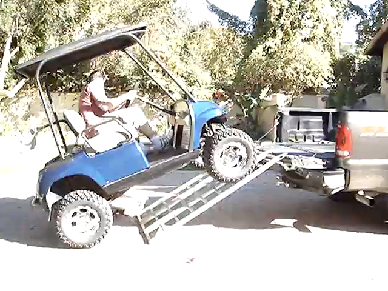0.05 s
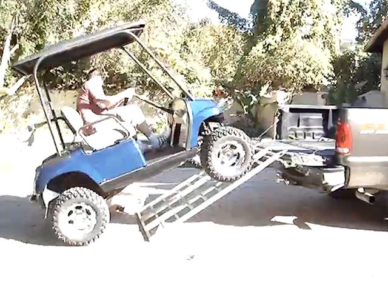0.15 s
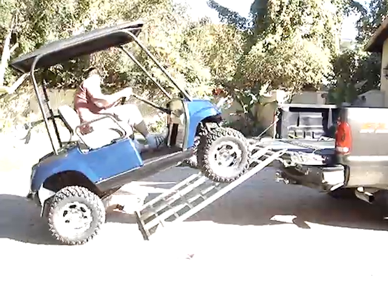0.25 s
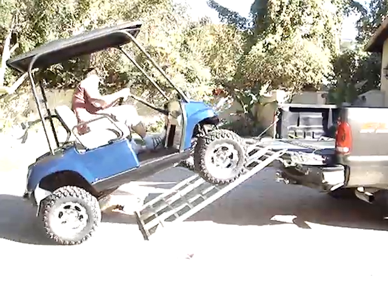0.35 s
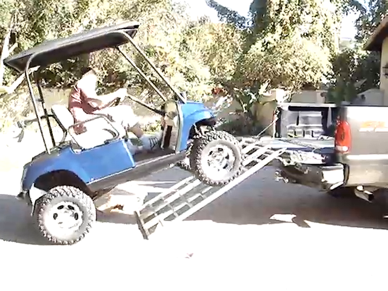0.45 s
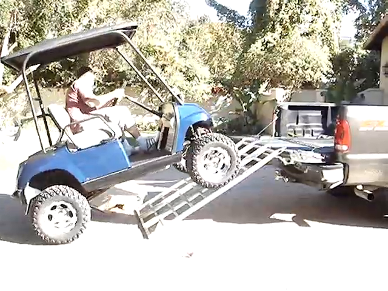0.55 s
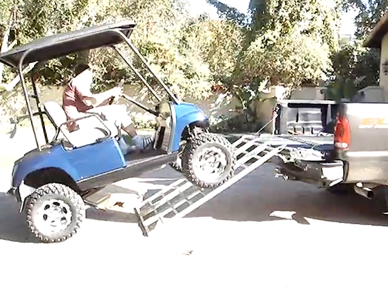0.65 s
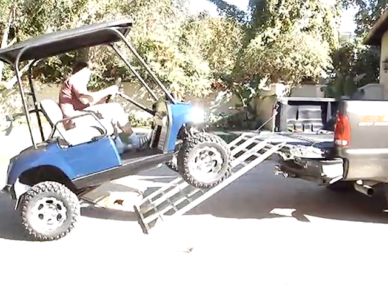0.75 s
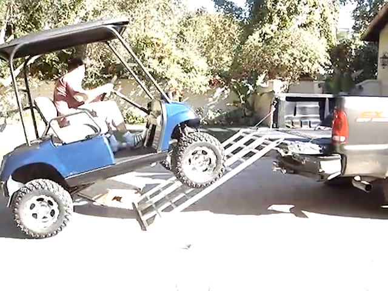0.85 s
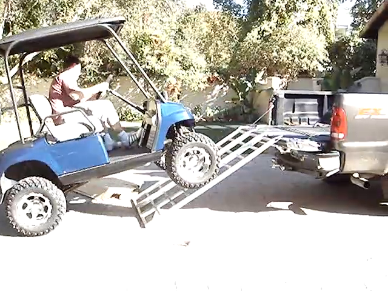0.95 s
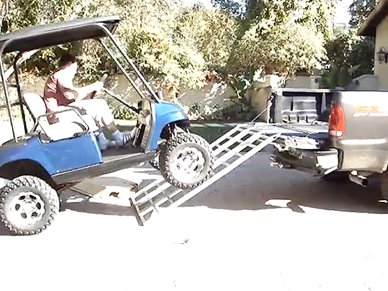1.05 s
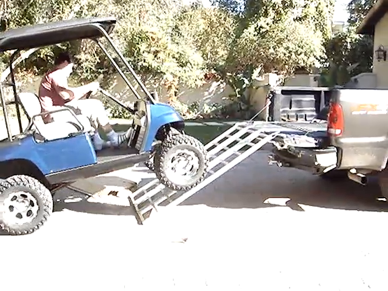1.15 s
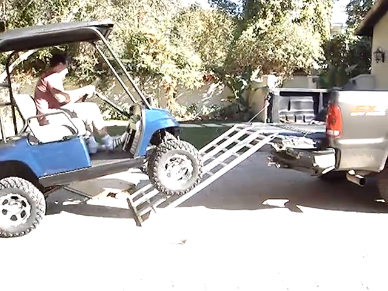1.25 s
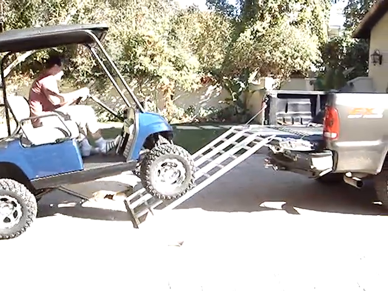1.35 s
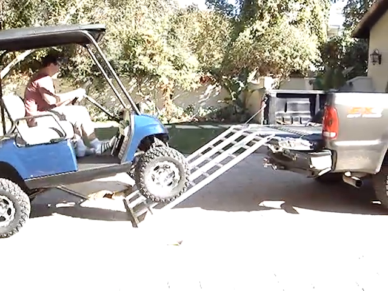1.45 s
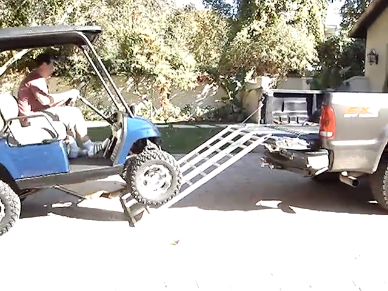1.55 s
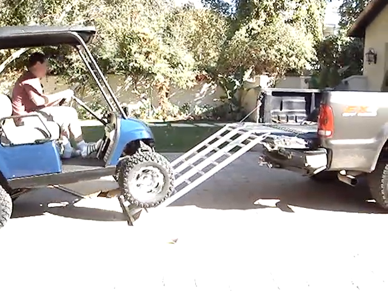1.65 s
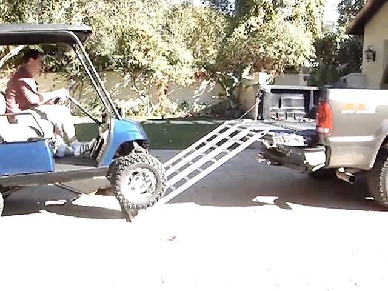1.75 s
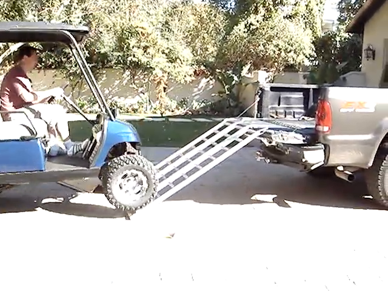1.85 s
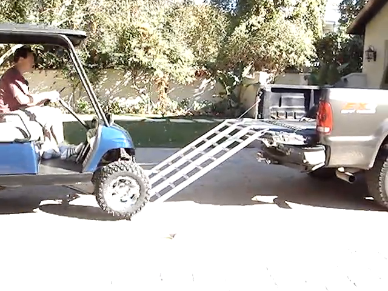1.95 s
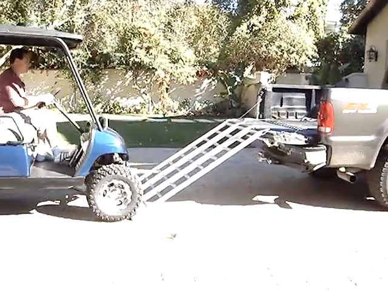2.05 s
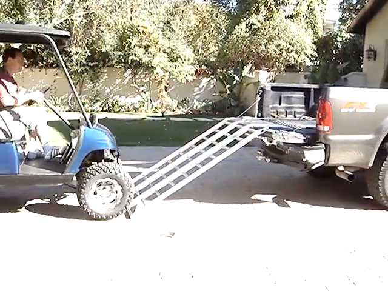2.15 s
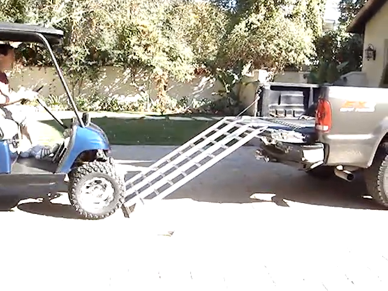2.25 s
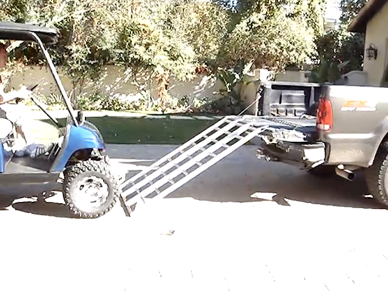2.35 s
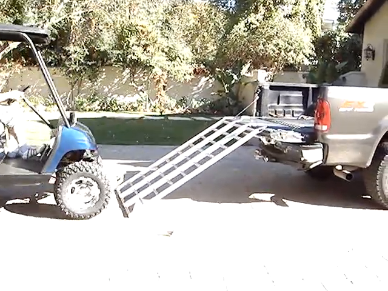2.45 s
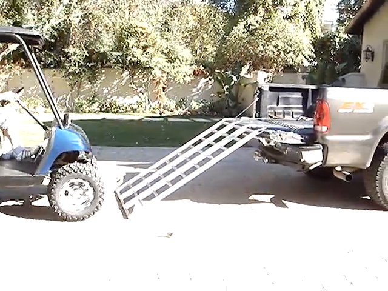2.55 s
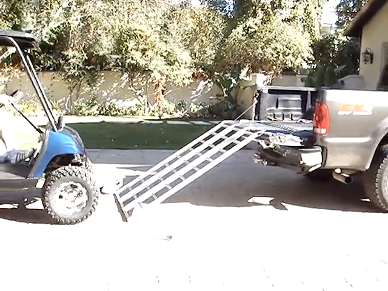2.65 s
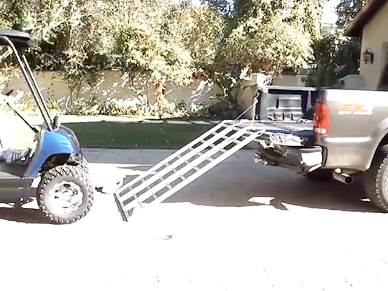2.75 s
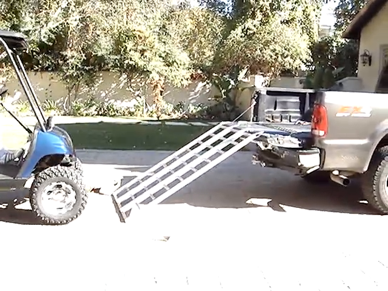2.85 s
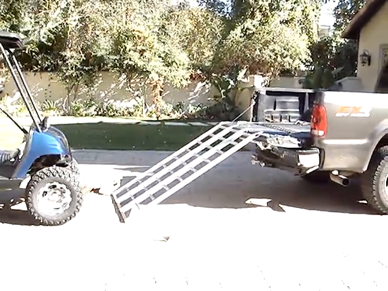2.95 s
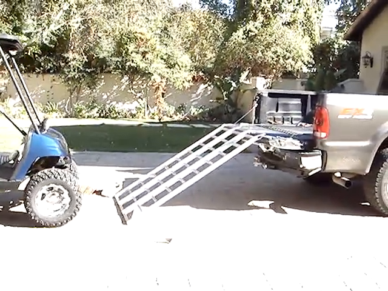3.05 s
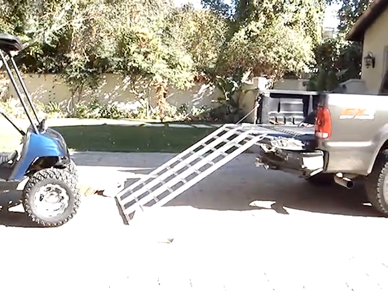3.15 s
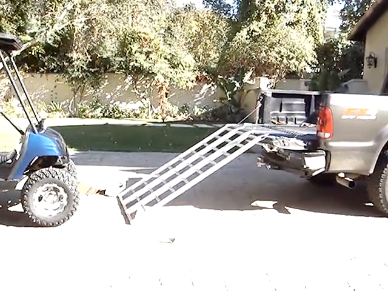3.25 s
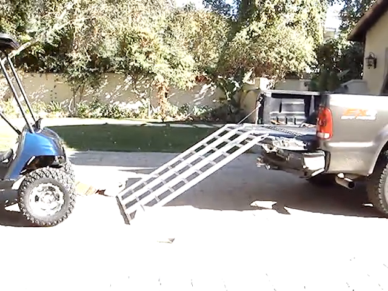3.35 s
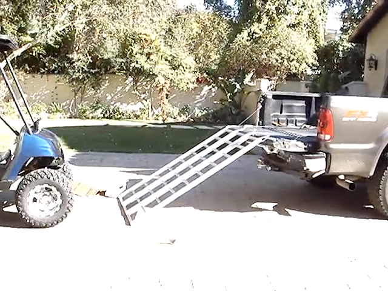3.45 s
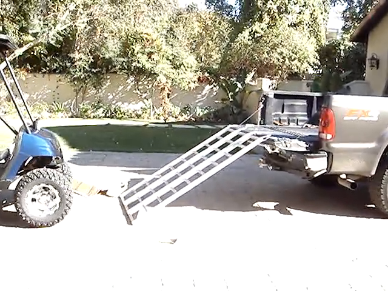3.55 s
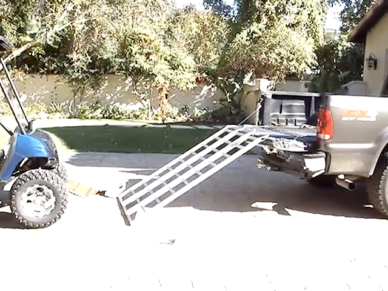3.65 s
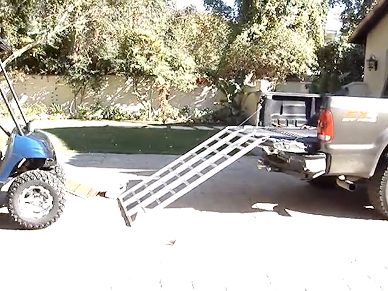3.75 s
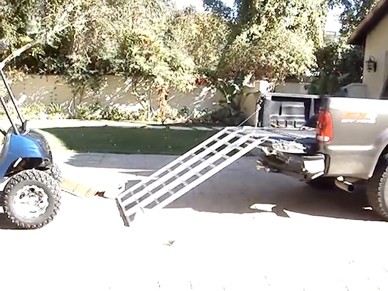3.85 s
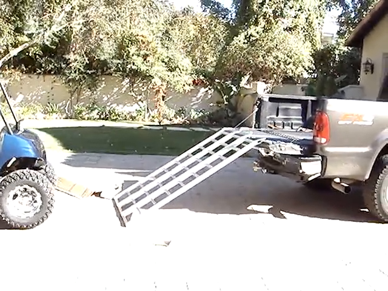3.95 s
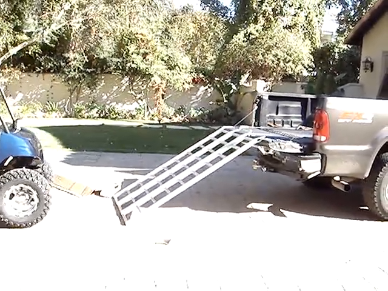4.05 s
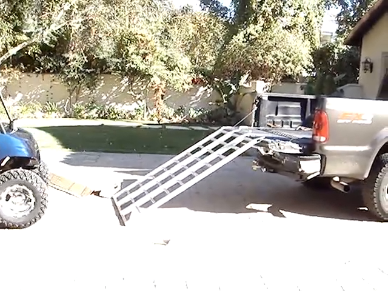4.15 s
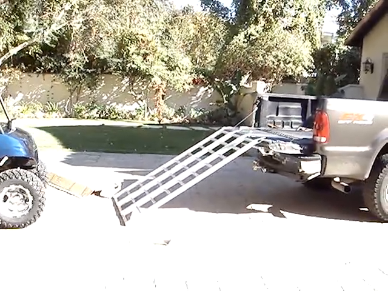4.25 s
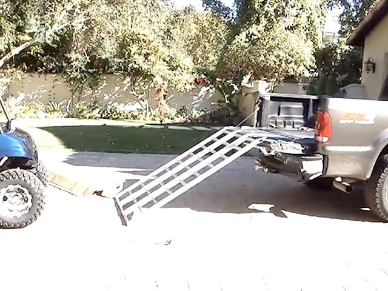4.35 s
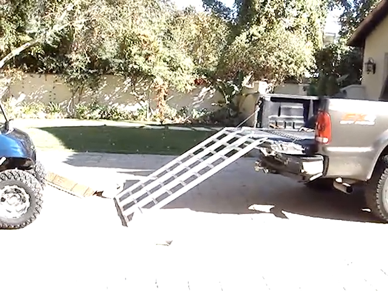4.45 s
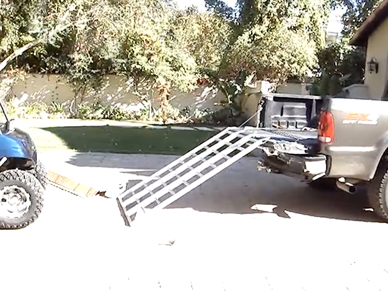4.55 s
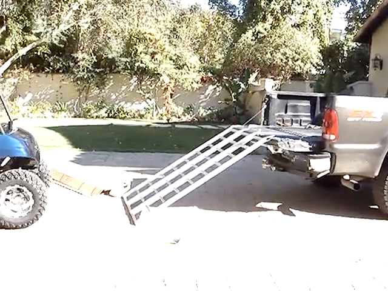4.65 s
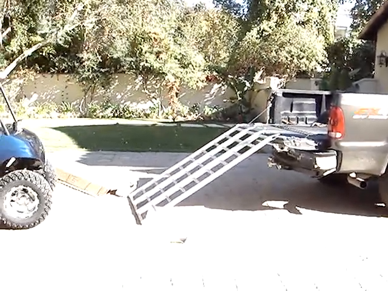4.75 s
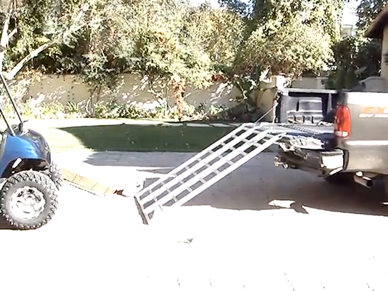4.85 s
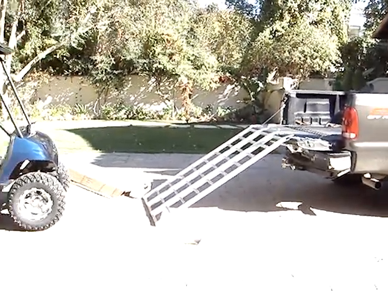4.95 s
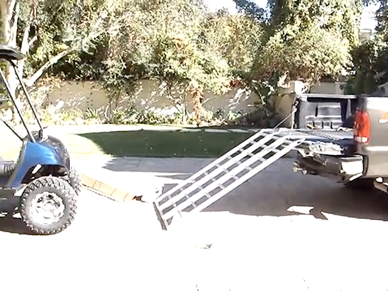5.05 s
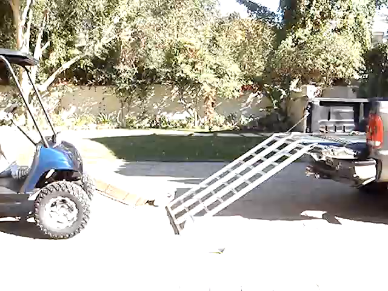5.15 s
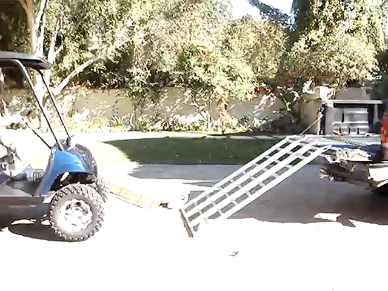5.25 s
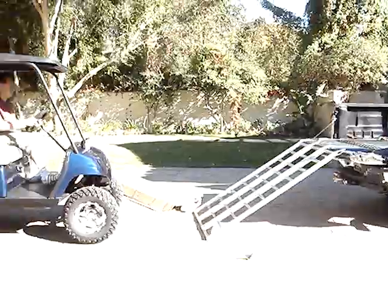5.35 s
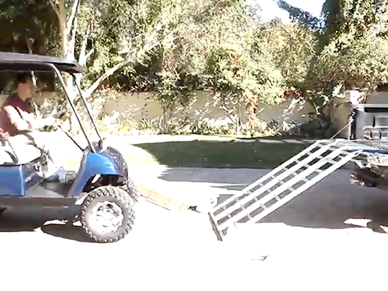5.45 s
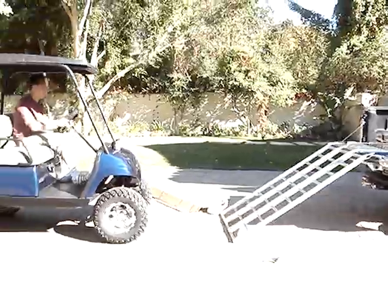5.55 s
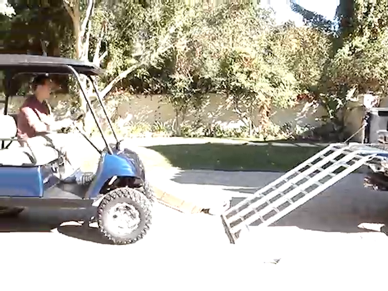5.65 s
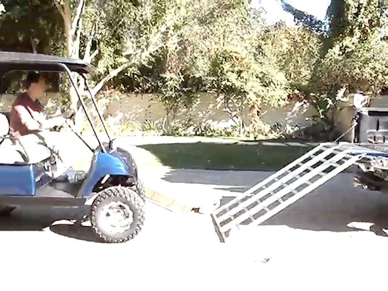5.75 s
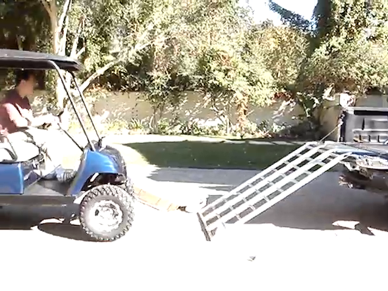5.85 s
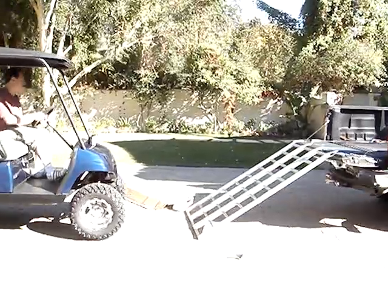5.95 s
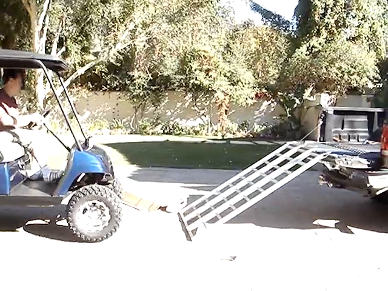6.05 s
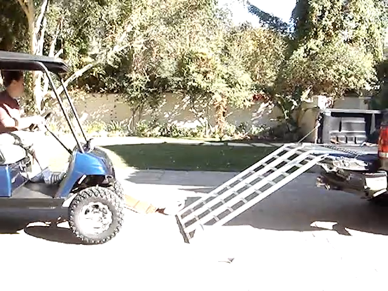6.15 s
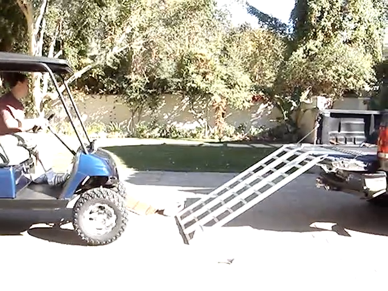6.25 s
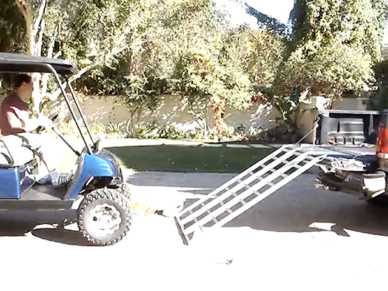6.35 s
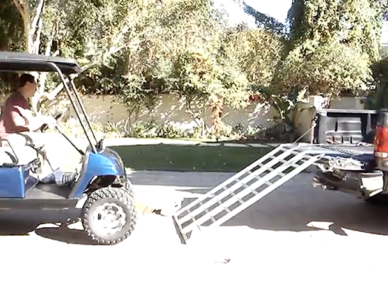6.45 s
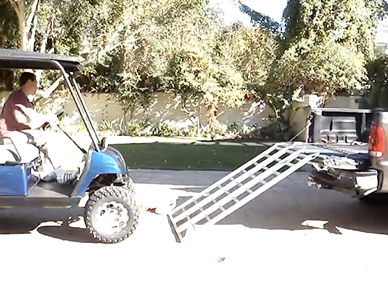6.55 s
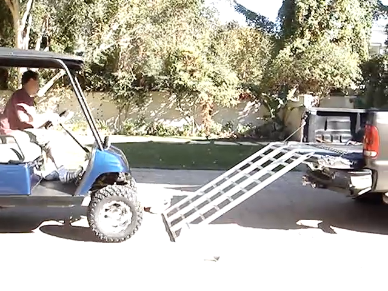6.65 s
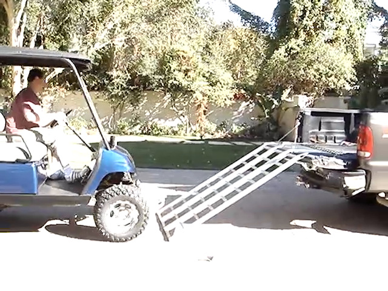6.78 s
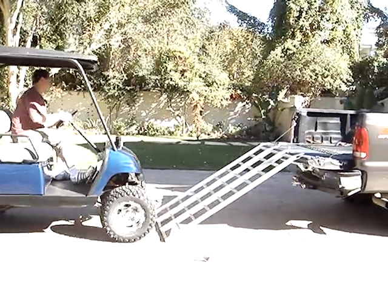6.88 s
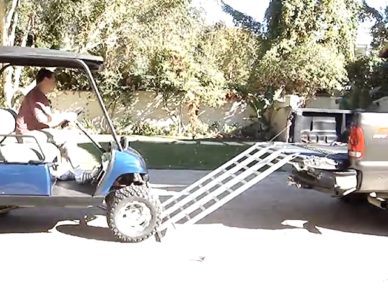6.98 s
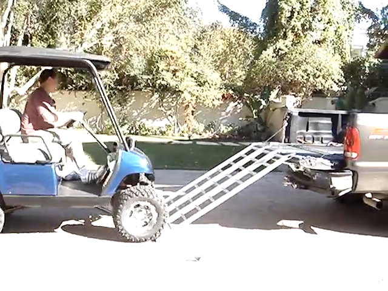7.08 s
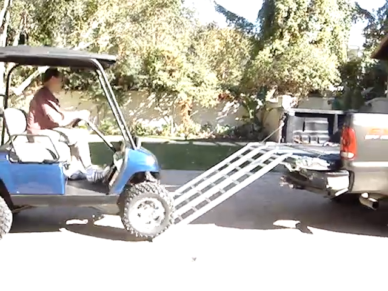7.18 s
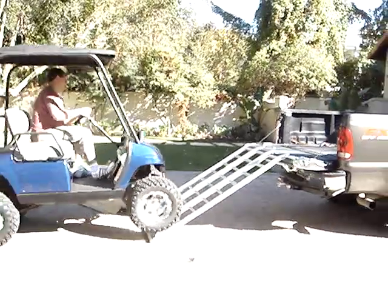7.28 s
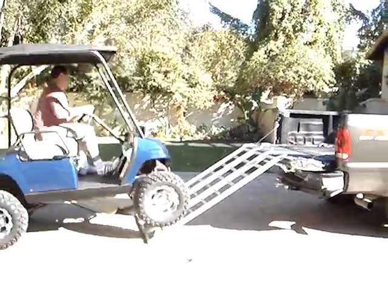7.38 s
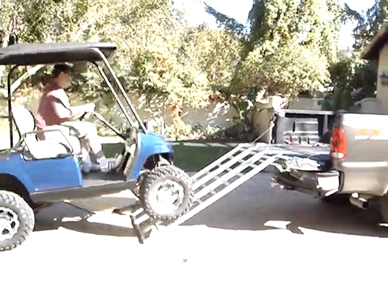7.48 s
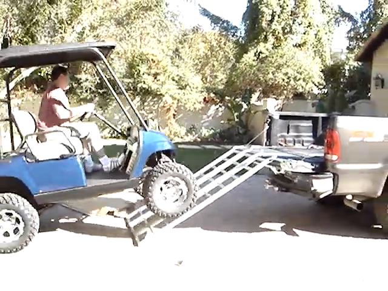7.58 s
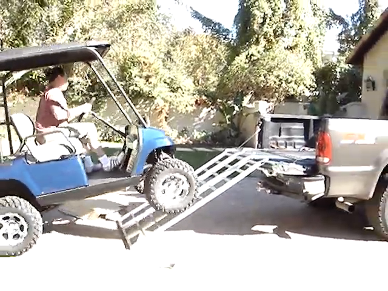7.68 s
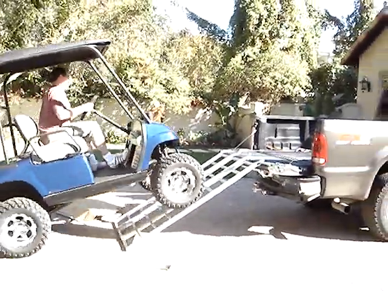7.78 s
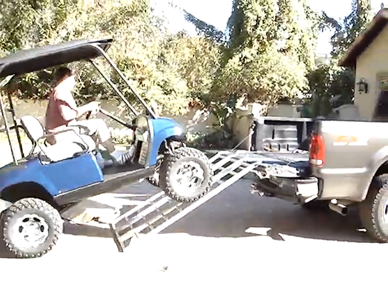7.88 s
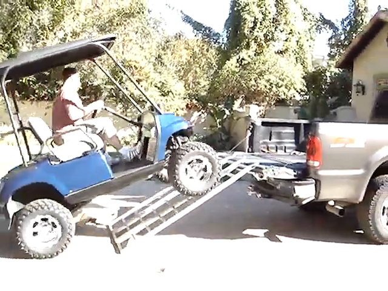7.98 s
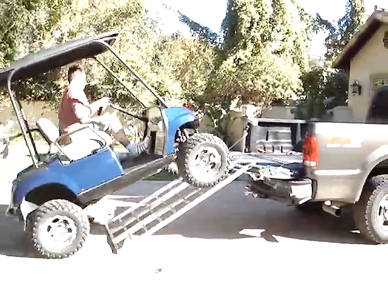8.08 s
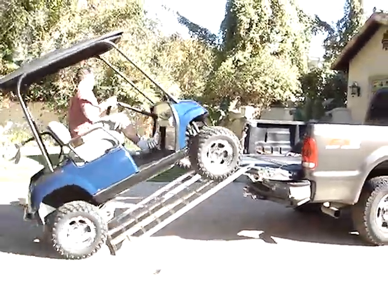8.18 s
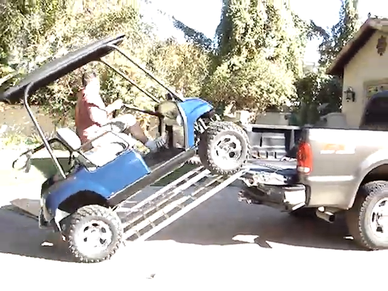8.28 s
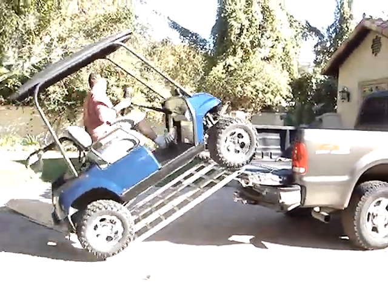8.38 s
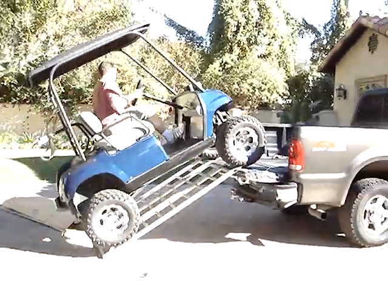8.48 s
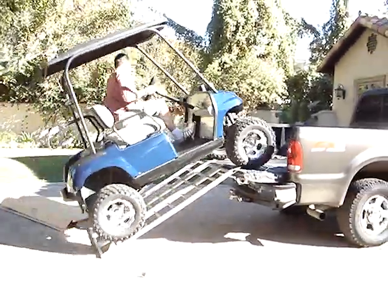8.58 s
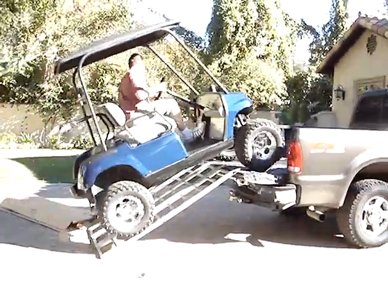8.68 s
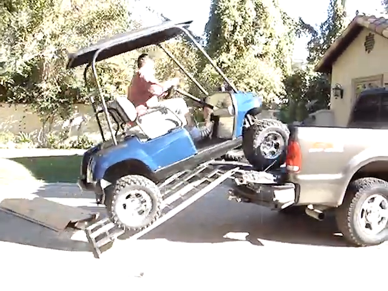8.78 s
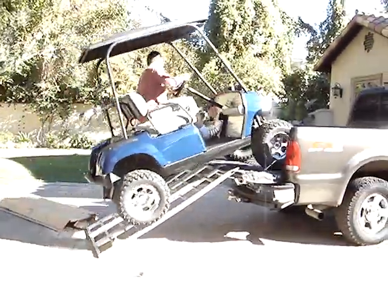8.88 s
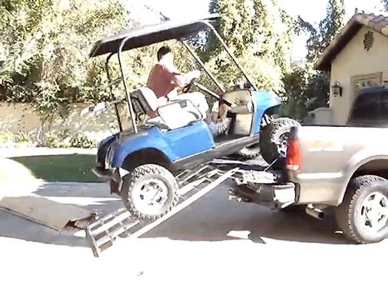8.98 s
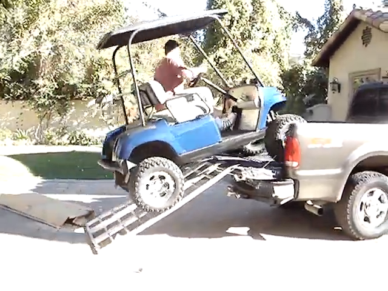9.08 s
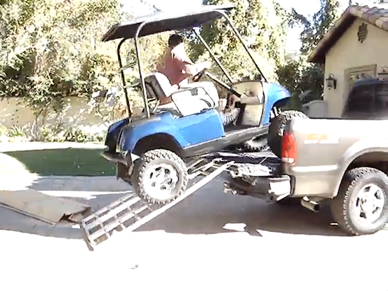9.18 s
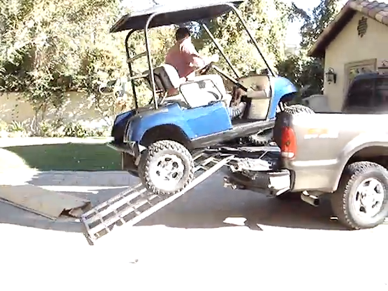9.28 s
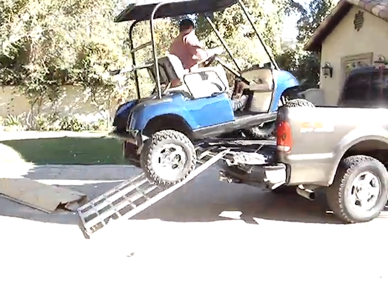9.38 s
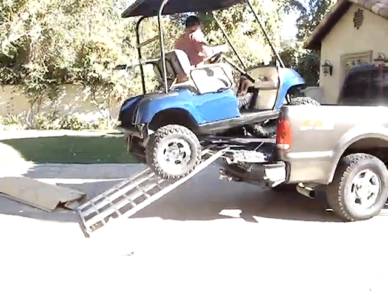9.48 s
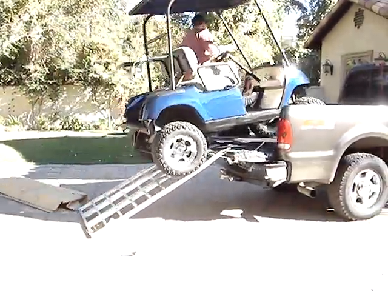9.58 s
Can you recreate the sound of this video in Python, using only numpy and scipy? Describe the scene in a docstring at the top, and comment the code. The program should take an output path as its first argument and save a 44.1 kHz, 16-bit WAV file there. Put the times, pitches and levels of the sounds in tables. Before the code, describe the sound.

Quiet outdoor air with faint distant hum. From 0 to 1.7 s a cart coasts backwards, engine off, with small metallic ticks, knocks and a low gear buzz. Around 2.1 s a clank and soft bump mark the wheels leaving metal ramps; the ratchety buzz is strongest and highest from 2 to 3 s, then loosens into slowing clicks, fading out near 5.2 s. A pedal latch snaps at 5.2 s, a starter heaves and whirrs briefly, and at 5.4 s a single-cylinder petrol engine catches with clatter. It putters up, sags by 6.05 s, revs until 6.5 s, and sags again. At 7.1 s the pedal clacks, ramps bang, and the engine pulls steadily harder, a rapid throaty chug with crankcase rattle. Bright steel clangs hit at 8.4, 8.5 and 8.75 s. Towards the end the exhaust turns raspier and droning, still running under load, with short nearby echoes.

```python
"""In a yard beside a house, a golf cart rolls backwards down aluminium ramps, engine off, onto the drive.
Tooth contacts make its axle gears buzz; short decaying modes and noise make the knocks and clangs.
The pedal clicks, the starter turns and the single petrol cylinder catches, coasts, then pulls hard:
pulses, gated noise and clean tones, all tied to the firing rate, voice exhaust, bark, clatter and drone.
The cart climbs into a pickup bed and its tailpipe swings into view, over short echoes and quiet air."""
import sys
import numpy as np
from scipy import signal
from scipy.fft import rfft, irfft, next_fast_len
from scipy.io import wavfile
from scipy.ndimage import uniform_filter1d, map_coordinates

SR = 44100
rng = np.random.default_rng(int(sys.argv[2]) if len(sys.argv) > 2 else 0)


def to_wav(s):
    """Save 16-bit WAV."""
    ch = np.atleast_2d(s).T  # columns
    pcm = np.round(np.clip(ch, -1, 1) * 32767)  # PCM
    wavfile.write(sys.argv[1], SR, pcm.astype(np.int16))


N = 424241
TIME = np.arange(N) / SR
SIZE = next_fast_len(N + SR)
HZ = np.fft.rfftfreq(SIZE, 1 / SR)

# engine speed: (time [s], firing rate [1/s])
SPEED = [(5.4, 7.28), (5.6, 10.7), (5.75, 13.03), (5.9, 9.87), (6.05, 7.27), (6.17, 10.96), (6.3, 13.77),
         (6.53, 15.82), (6.75, 11.66), (6.93, 9.81), (7.03, 8.12), (7.15, 12.77), (7.35, 14.92),
         (7.65, 17.83), (8.0, 19.36), (8.3, 19.93), (8.7, 20.55), (9.62, 19.91)]
# presses of the accelerator: (down [s], up [s], throttle [0-1])
PEDAL = [(5.412, 5.68, 0.28), (6.115, 6.524, 0.78), (7.101, 9.7, 0.94)]
# multiples of the firing rate that the tailpipe sounds cleanly: (order)
DRONE_ORDERS = [2, 4, 6, 8, 9, 10, 11, 12, 13, 15, 16, 21, 22, 28, 30, 36, 38, 40]
# mean level of each of those orders with the tailpipe in full view: (level [dB])
DRONE_DB = [-46.5, -48, -46, -47, -48, -46, -42, -45, -46, -41.5, -32, -42.5, -47, -45, -45, -42, -42, -43]
# the muffler hum's note as the cart turns: (time [s], centre [Hz])
HUM_NOTE = [(7.2, 304.6), (7.9, 319), (8.2, 276), (8.8, 314)]
# rolling backwards: (time [s], teeth meshing [1/s], buzz level [dB])
ROLL = [(0, 38, -68), (0.42, 48, -64), (0.56, 59, -50.5), (0.75, 70, -48.5), (0.97, 80, -45),
        (1.1, 105, -39.5), (1.28, 85, -48), (1.48, 53.5, -56), (1.8, 111, -46.5), (1.86, 121, -36.5),
        (2.17, 141, -30.5), (2.38, 137, -41.5), (2.49, 137, -32.5), (2.83, 162, -34.5), (2.92, 151, -42.5),
        (3.03, 136, -46), (3.065, 133, -31), (3.11, 126, -43), (3.15, 120, -33.5), (3.2, 118, -41.5),
        (3.45, 93, -41.5), (3.73, 90, -42), (3.9, 50.4, -60.5), (4.125, 60, -71), (4.14, 80, -42.5),
        (4.2, 76, -54), (4.225, 76, -39.5), (4.35, 66, -49), (4.41, 68.5, -42), (4.6, 68, -45.5),
        (4.76, 56, -52), (4.95, 35, -55), (5.15, 28, -70)]
# broadband clatter of ramps, chassis, pedal, starter and the engine catching:
# (time [s], level [dB], t60 [s], share of bright steel jingle [0-1])
CLANGS = [(1.818, -35, 0.23, 0), (1.848, -34, .1, 0.6), (2.055, -20.5, .15, 0.05), (2.117, -28, 0.53, .08),
          (5.183, -29.5, 0.066, 0.14), (5.271, -33.5, 0.08, 0.3), (5.418, -20.5, .15, 0),
          (5.486, -25.5, 0.046, .05), (5.535, -27.5, 0.26, 0.16), (5.631, -24.5, 0.21, 0.2),
          (6.057, -26.5, 0.073, 0), (6.118, -24, 0.12, 0.13), (7.091, -22.5, 0.12, 0.13),
          (7.177, -27.5, .04, .1), (7.207, -19.5, 0.35, 0.04), (7.217, -22, 0.31, .2),
          (7.244, -22, .14, 0.1), (8.385, -27, 0.12, .8), (8.414, -18, 0.3, 0.16), (8.53, -26, 0.28, 0.6),
          (8.745, -26, 0.11, 0.7), (8.756, -16, .15, 0.23)]
# knocks of pedal, linkage and suspension, and thumps as the engine catches:
# (time [s], level [dB], ring [Hz], t60 [s])
KNOCKS = [(0.063, -41, 3400, 0.018), (0.246, -35, 1100, 0.092), (0.455, -44, 1017, 0.1),
          (0.542, -39.5, 1097, 0.16), (1.065, -36.5, 1050, 0.25), (1.301, -34, 2610, 0.047),
          (1.59, -38, 1060, 0.025), (1.627, -29, 1063, 0.042), (1.667, -38.5, 2500, .03),
          (1.708, -27.5, 1090, 0.043), (1.796, -31, 602, 0.04), (1.826, -30, 1350, .06),
          (1.863, -28.5, 1650, 0.067), (2.2, -29, 210, .1), (2.41, -30.5, 985, 0.14),
          (2.686, -31, 760, 0.11), (4.089, -38, 3830, 0.018), (4.089, -27, 435.4, 0.022),
          (4.209, -35, 1030, 0.045), (5.418, -21, 1100, 0.06), (5.45, -35.5, 6400, 0.14),
          (5.487, -20, 1006, 0.07), (5.637, -25, 320, .07), (7.257, -17, 1460, 0.028)]
# modes of the pedal's latch: (frequency [Hz], level [dB], t60 [s])
LATCH_MODES = [(1053, -13, 0.083), (1668, 0.5, 0.068), (2600, -13, 0.085), (2939, -15, 0.09),
               (3483, -16, 0.053), (4400, -17, 0.064), (6492, -21, .04)]
# wheels bumping over the foot of the ramps: (time [s], level [dB], rise [s], fall [s])
BUMPS = [(2.16, -36, 0.11, 0.11), (8.7, -28.5, 0.45, 0.18)]
# the truck's echo comes ever sooner as the cart closes in: (time [s], delay [s])
ECHO_DELAY = [(5.4, .011), (7.2, .008), (9.6, .003)]
# decay of the answer from house wall and truck: (frequency [Hz], t60 [s])
YARD = [(200, 0.21), (1500, 0.93), (9000, 0.15)]
# faint distant hums: (from [s], to [s], frequency [Hz], level [dB])
DISTANT_HUMS = [(0, 9.7, 59.2, -67), (0, 9.7, 118.4, -64), (0.55, 1.75, 106, -63), (4.58, 9.7, 145, -59)]

# broad colours of each voice, power density before scaling to unit power: (frequency [Hz], density [dB])
MUFFLER = [(30, -19.5), (45, -18), (80, -11.5), (150, -12.5), (220, -4.5), (290, -4), (350, -3.5),
           (400, -7), (480, -23.5), (900, -47.5), (3000, -77)]
# bark from under the cover, heard from the side: (frequency [Hz], density [dB])
SIDE_BARK = [(150, -15.5), (420, -8), (600, -9.5), (750, -3), (950, -2), (1500, -5.5), (2400, -9.5),
             (3200, -11), (4500, -18.5), (6000, -41)]
# bark heard from behind: (frequency [Hz], density [dB])
REAR_BARK = [(150, -60.5), (420, -5.5), (540, 3.5), (740, 2.5), (1000, -1.5), (1500, -3), (2400, -5),
             (3200, -43), (6000, -38)]
# crankcase clatter: (frequency [Hz], density [dB])
CLATTER = [(800, -43.5), (2000, -17), (2700, 6.5), (3080, -1), (3400, 2), (3900, -2.5), (5000, -7),
           (7000, -11.5), (10000, -23)]
# body panels: (frequency [Hz], density [dB])
PANELS = [(150, -41), (430, -9.5), (540, -1.5), (1100, -5), (1700, -8), (2800, -11), (3100, -17),
          (5000, -15.5), (6500, -28.5), (10000, -49)]
# tread roar, also the base of the ringing rungs: (frequency [Hz], density [dB])
TREAD = [(250, -14), (560, -4.5), (950, 1), (1250, -8), (1450, -4.5), (2000, -13), (3300, -13.5),
         (5200, -17), (7000, -30), (10000, -37)]
# broadband clangs: (frequency [Hz], density [dB])
CLANG_COLOUR = [(100, -4.5), (450, -2.5), (800, 10.5), (1600, -0.5), (2600, 6), (4500, 2), (7000, -7),
                (10000, -20)]
# bright steel jingle: (frequency [Hz], density [dB])
JINGLE = [(1000, -34.5), (3000, -8.5), (4500, 0.5), (6500, 0), (8000, -2.5), (10000, -12)]
# tyre rumble: (frequency [Hz], density [dB])
RUMBLE = [(25, -25), (70, -16.5), (160, -0.5), (280, 1), (500, -6), (1200, -66)]
# outdoor air: (frequency [Hz], density [dB])
AIR = [(25, -26), (54, -6), (92, -9.5), (131, -4), (284, -3), (356, -5.5), (2850, -19.5), (3940, -21.5),
       (9960, -28)]

# muffler and tailpipe resonances: (frequency [Hz], width [Hz], lift [dB])
PIPE_MODES = [(222, 30, 3), (272, 26, 3), (326, 30, 6.5)]
# engine cover resonances: (frequency [Hz], width [Hz], lift [dB])
COVER_MODES = [(743, 81, 5.9), (892, 50, 3.3), (985, 67, 5.7), (1128, 55, 2.3), (1309, 83, 4.4),
               (1835, 260, 3.2), (2190, 73, 1.6), (2480, 180, 6)]
# crankcase resonances: (frequency [Hz], width [Hz], lift [dB])
CASE_MODES = [(2840, 59, 3.8), (3406, 80, 4), (4190, 65, 4.5), (4780, 150, 6.6), (5420, 130, 3.5),
              (6020, 100, 5.7), (6800, 79, 4), (8300, 65, 5.8)]
# body panel resonances: (frequency [Hz], width [Hz], lift [dB])
PANEL_MODES = [(588, 130, 10.5), (767, 70, 12), (1065, 193, 13), (1434, 110, 10), (1570, 70, 7.3),
               (1890, 100, 9.4), (2090, 78, 9.9), (2350, 100, 4.8), (2672, 200, 11.8), (3320, 100, 10.3),
               (4030, 130, 11)]
# ramp rung resonances: (frequency [Hz], width [Hz], lift [dB])
RUNG_MODES = [(1070, 150, 5), (1450, 130, 5)]

# engine voices: (level at full rate and throttle [dB], slope [dB per doubling of speed],
# change with the throttle shut [dB], change while far away [dB])
FULL_RATE = 20  # firings per second
EXHAUST_LAW = (-23, 8, -4.5, 0)
BARK_LAW = (-23.1, 4.5, -4, -1.5)
CLATTER_LAW = (-30.5, 7, -10, -1)
# force of a firing when coasting, and what full throttle adds
COAST_FORCE, THROTTLE_FORCE = 0.21, 0.36
THROTTLE_OPEN_S, THROTTLE_SHUT_S = 0.012, 0.099  # opening time, closing time constant
APPROACH_S = (6.8, 6.86)  # the cart draws nearer
# the tailpipe swings into view, and the muffler's boom drops as heard from behind
TURN_S, BEHIND_DB = (7.9, 9.34), -14
# muffler hum: spread, and level beside the thumps at full rate and throttle
HUM_WIDTH_HZ, HUM_DB = 34, -5.5

# a tooth rebounds once: mean delay, unevenness, size
REBOUND_S, CONTACT_JITTER_S, REBOUND_SIZE = .0019, .0002, 0.6
SLACK_S = (2.85, 3.25)  # loaded grind turns to loose ticking
SOFT_TOOTH_HZ = 3000  # slow teeth land softly and lose treble above this
SURGE_RATE, SURGE_DB = 12, 1.3  # buzz surges as the tyre knobs land: mean per second, depth
TREAD_DB = -7.5  # tread roar beside the gears under load
RAMP_SHARE, LEAVES_RAMPS_S = .6, (1.3, 1.7)  # power share of buzz ringing the rungs, until the wheels leave
# the starter heaves the piston, its belt grabs, it lets go
HEAVE_S, GRAB_S, RELEASE_S = 5.25, 5.283, 5.41
OVERTONE_RATIO, OVERTONE_DB = 1.68, -12  # a knock's second mode
LATCH_S, LATCH_DB = 5.183, -23
# rumble rolling back at FAST_MESH teeth a second, and driving at full rate
FAST_MESH, ROLL_RUMBLE_DB, DRIVE_RUMBLE_DB = 163, -50.5, -37
ECHO_DB = -14  # truck echo beside the direct sound
TOP_HZ = 10150


def engine():
    """A four-stroke single: each firing thumps the muffler, barks under the cover and shakes the crankcase."""
    rate, = curves(SPEED)
    turns = np.cumsum(rate) / SR
    turns -= np.interp(SPEED[0][0], TIME, turns)
    running = ramp(PEDAL[0][0], PEDAL[0][0] + THROTTLE_OPEN_S)
    load = throttle()
    rear = ramp(*TURN_S)
    force = np.abs(COAST_FORCE + THROTTLE_FORCE * load)
    exhaust_db = voice_level(EXHAUST_LAW, rate, load) + BEHIND_DB * rear ** 0.78
    # no two firings burn alike
    bark_db = voice_level(BARK_LAW, rate, load) + 0.68 * wobble(14)
    clatter_db = voice_level(CLATTER_LAW, rate, load) + 0.73 * wobble(33)
    metal = strikes(turns, count=150)
    voices = amp(exhaust_db) * exhaust(turns, rate, load, force)
    voices += amp(bark_db) * bark(turns, rate, force, rear, metal)
    voices += amp(clatter_db) * clatter(turns, rate, force, metal)
    return running * (voices + drone(turns, rear))


def voice_level(law, rate, load):
    """Speed, throttle and nearness set the level of an engine voice in dB."""
    full, per_doubling, shut, far = law
    away = 1 - ramp(*APPROACH_S)
    return full + per_doubling * np.log2(rate / FULL_RATE) + shut * (1 - load) + far * away


def throttle():
    """The throttle snaps open with each press and eases shut after it."""
    opening = np.zeros(N)
    for down, up, depth in PEDAL:
        easing = np.exp(-np.maximum(TIME - up, 0) / THROTTLE_SHUT_S)
        opening += depth * ramp(down, down + THROTTLE_OPEN_S) * easing
    return opening


def exhaust(turns, rate, load, force):
    """The blow-down pulse, nearly as strong turbulence and a weaker intake gulp ring the muffler."""
    blowdown = pulses(turns - 0.01308 * rate, scatter_db=1.0) * np.sqrt(force)
    gulp = pulses(turns - .62, scatter_db=2.5) * (1 - 0.25 * load)
    turbulence = noise() * puffs(turns, force, start=0.14, rise=0.26, fall=0.15, base=0.51)
    gas = .74 * blowdown + .3 * gulp + .58 * turbulence
    hum = amp(HUM_DB) * load * rate / FULL_RATE * pipe_hum(turns, rate)
    return body(gas, MUFFLER, PIPE_MODES) + hum


def pipe_hum(turns, rate):
    """The muffler's air keeps sounding between firings, on whichever orders lie near its note."""
    note = curves(HUM_NOTE)[0] * np.exp(.05 * wobble(20))
    hum = np.zeros(N)
    for order in range(10, 44):
        nearness = np.exp(-((order * rate - note) / HUM_WIDTH_HZ) ** 2)
        hum += nearness * np.sin(2 * np.pi * (order * turns + rng.random()))
    return unit(hum * np.sqrt(rate))


def bark(turns, rate, force, rear, metal):
    """Rattle and metal strikes swell with each firing and ring the cover, then the rear."""
    # rise scales with rate: the same few milliseconds at any speed
    chug = puffs(turns, force, start=.005, rise=.011 * rate, fall=.24, base=.28)
    metal_share = .25 + .25 * rear
    grit = np.sqrt(1 - metal_share) * rattle(grain_db=1.1, rate=700)
    blast = 1.172 * (grit + np.sqrt(metal_share) * metal) * chug
    blast = shifting(blast, depth_db=2.6)
    side = np.sqrt(1 - rear) * body(blast, SIDE_BARK, COVER_MODES)
    return side + np.sqrt(rear) * body(blast, REAR_BARK, COVER_MODES)


def clatter(turns, rate, force, metal):
    """Firings shake fine rattles and metal strikes out of the crankcase."""
    shake = puffs(turns, force, start=-.01, rise=.005 * rate, fall=.38, base=.4)
    ticks = (0.97 * rattle(grain_db=2.5, rate=950) + 0.18 * metal) * shake
    return body(ticks, CLATTER, CASE_MODES)


def strikes(turns, count):
    """Valve gear and piston strike at the same crank angles in every cycle."""
    angles = (np.arange(count) + rng.random(count)) / count
    return unit(sum(rng.choice([-1, 1]) * pulses(turns + angle, scatter_db=2) for angle in angles))


def drone(turns, rear):
    """Behind the cart the pipe drones on clean orders of the firing rate."""
    tones = np.zeros(N)
    for order, db in zip(DRONE_ORDERS, DRONE_DB):
        tones += amp(db + 0.79 * wobble(6)) * np.sin(2 * np.pi * (order * turns + rng.random()))
    return np.sqrt(2) * tones * rear ** 2


def gears():
    """Each tooth lands, rebounds and scrapes, ringing panels and ramps; under load tread roar blurs the ticks."""
    rate, level_db = curves(ROLL)
    slack = ramp(*SLACK_S)
    turns = np.cumsum(rate * np.exp((.06 - .03 * slack) * wobble(70))) / SR
    rebound_delay = REBOUND_S + CONTACT_JITTER_S * wobble(160)
    rebound = pulses(turns - rate * rebound_delay, scatter_db=2)
    contacts = unit(pulses(turns, scatter_db=1) + REBOUND_SIZE * rebound)
    scrape = noise() * puffs(turns, 1, start=0, rise=.08, fall=.24, base=.35)
    clicking = .5 + .25 * slack
    buzz = np.sqrt(clicking) * contacts + np.sqrt(1 - clicking) * scrape
    # treble grows with speed
    lowpass = signal.butter(4, SOFT_TOOTH_HZ, fs=SR, output="sos")
    soft = signal.sosfiltfilt(lowpass, buzz)
    buzz = soft + (buzz - soft) * np.minimum(1, .15 + rate / FAST_MESH)
    knobs = np.cumsum(SURGE_RATE * np.exp(.2 * wobble(4))) / SR
    level = amp(level_db + SURGE_DB * np.sin(2 * np.pi * knobs)) * rolling()
    buzz = buzz * level
    tread = amp(TREAD_DB) * body(noise() * level * (1 - slack), TREAD)
    on_ramps = RAMP_SHARE * (1 - ramp(*LEAVES_RAMPS_S))
    rungs = body(buzz * np.sqrt(on_ramps), TREAD, RUNG_MODES)
    return body(buzz * np.sqrt(1 - on_ramps), PANELS, PANEL_MODES) + rungs + tread


def rolling():
    """1 while the cart rolls backwards, 0 once it has stopped."""
    return 1 - ramp(ROLL[-1][0], ROLL[-1][0] + 0.05)


def clangs():
    """Ramps, chassis, pedal, starter and catching engine clatter as fading noise, part of it a bright jingle."""
    clang, jingle = np.zeros((2, N + SR))
    t = np.arange(SR // 2) / SR
    for s, db, t60, bright in CLANGS:
        fade = amp(db - 60 * t / t60) * (1 - np.exp(-t / 0.0014))
        share = np.clip(bright, 0, 1)
        clang[round(s * SR):][:len(t)] += fade * np.sqrt(1 - share)
        jingle[round(s * SR):][:len(t)] += fade * np.sqrt(share)
    chatter = shifting(rattle(grain_db=1.8, rate=300), depth_db=4)
    clang_modes = [(783, 70, 6.0), (1100, 40, 3), (1625, 390, 12), (2700, 60, 3)]
    jingle_modes = [(4700, 150, 4), (6450, 260, 4.5), (7600, 200, 3.6)]
    broad = body(clang[:N] * chatter, CLANG_COLOUR, clang_modes)
    steel = body(jingle[:N] * rattle(grain_db=4, rate=530), JINGLE, jingle_modes)
    return broad + 0.73 * steel


def starter():
    """The starter heaves the piston over; its belt grabs, then whirrs until the engine catches."""
    thump = np.sqrt(2) * np.sin(2 * np.pi * 335 * TIME + .5 * wobble(90))
    belt_colour = [(250, -16.0), (600, -2.0), (850, 6.0), (1050, -2.0), (1300, -4.5), (2800, -11.5),
                   (9000, -37.0)]
    belt = body(rattle(grain_db=3.0, rate=500), belt_colour)
    turning = ramp(HEAVE_S, GRAB_S) * (TIME < RELEASE_S)
    whirr = amp(-38.5) * turning + amp(-33.0) * swell(GRAB_S, rise=0.0091, fall=0.016)
    heave = amp(-36.0) * swell(HEAVE_S, rise=0.013, fall=0.037)
    return heave * thump + whirr * belt


def knocks():
    """Each knock or thump rings two modes briefly, while a shorter clack rings the panels."""
    rings, clacks = np.zeros((2, N + SR))
    t = np.arange(SR // 2) / SR
    for s, db, hz, t60 in KNOCKS:
        fade = amp(db - 60 * t / t60) * (1 - np.exp(-t / .001))
        drift = .05 * np.cumsum(rng.standard_normal(len(t)))
        phase = 2 * np.pi * hz * t + drift
        ring = np.sin(phase) + amp(OVERTONE_DB) * np.sin(OVERTONE_RATIO * phase)
        rings[round(s * SR):][:len(t)] += fade * ring
        clacks[round(s * SR):][:len(t)] += fade * amp(-60 * t / t60) * rng.standard_normal(len(t))
    clack_colour = [(200, -36), (600, 1.5), (2000, 0.0), (4000, -5.5), (9000, -20)]
    return 1.3 * rings[:N] + 1.03 * body(clacks[:N], clack_colour, PANEL_MODES)


def latch():
    """The pedal's latch snaps free and its modes ring briefly."""
    t = np.maximum(TIME - LATCH_S, 0)
    ring = np.zeros(N)
    for hz, db, t60 in LATCH_MODES:
        phase = 2 * np.pi * (hz * t + rng.random()) + wobble(400)
        ring += amp(db - 60 * t / t60) * np.sin(phase)
    return amp(LATCH_DB) * ring * (1 - np.exp(-t / 0.0014))


def tyres():
    """Knobbly tyres drum the frame, louder with speed and over the foot of the ramps."""
    mesh, _ = curves(ROLL)
    rate, = curves(SPEED)
    back = amp(ROLL_RUMBLE_DB) * mesh / FAST_MESH * rolling()
    forward = amp(DRIVE_RUMBLE_DB) * (rate / FULL_RATE) ** 2 * (TIME > RELEASE_S)
    bumps = sum(amp(db) * swell(s, rise, fall) for s, db, rise, fall in BUMPS)
    return body(noise() * (back + forward + bumps) * amp(1.2 * wobble(20)), RUMBLE)


def truck_echo(x):
    """One moving reflection, which shifts the engine's fine resonances as the cart drives."""
    delay, = curves(ECHO_DELAY)
    echo = map_coordinates(x, [(TIME - delay) * SR], order=3)
    return (x + amp(ECHO_DB) * echo) / np.sqrt(1 + amp(ECHO_DB) ** 2)


def yard(x):
    """A short scattered answer from the house wall and the truck: noise decaying at its own pace per band."""
    hz, t, z = signal.stft(rng.standard_normal(SR // 2), SR, nperseg=256)
    decay = amp(-60 * t / along(YARD, hz)[:, None])
    tail = signal.istft(z * decay, SR, nperseg=256)[1]
    response = np.pad(tail / np.linalg.norm(tail), (SR // 100, 0))  # starts 10 ms late
    return signal.fftconvolve(x, response)[:N]


def garden():
    """Quiet outdoor air, as coloured noise, with distant hums."""
    hum = np.zeros(N)
    for start, end, hz, db in DISTANT_HUMS:
        present = ramp(start, start + 0.08) - ramp(end, end + 0.08)
        hum += present * amp(db + wobble(2.7)) * np.sqrt(2) * np.sin(2 * np.pi * hz * TIME)
    return amp(-51.5 + 0.68 * wobble(3.0)) * body(noise(), AIR) + hum


def amp(db):
    """Decibels to gain."""
    return 10 ** (np.asarray(db) / 20)


def unit(x):
    """Scale to rms 1."""
    return x / np.sqrt(np.mean(x ** 2) + 1e-20)


def along(points, hz):
    """(Hz, value) points read on a log axis."""
    f, v = np.transpose(points)
    return np.interp(np.log(hz + 1), np.log(f + 1), v)


def curves(rows):
    """One value per sample for each column after the time."""
    s, *cols = np.transpose(rows)
    return [np.interp(TIME, s, c) for c in cols]


def ramp(start, end):
    """A smooth step from 0 to 1 between two times."""
    return .5 - .5 * np.cos(np.pi * np.clip((TIME - start) / (end - start), 0, 1))


def swell(s, rise, fall):
    """A gain that rises to 1 at time s and dies away."""
    before, after = np.minimum(TIME - s, 0), np.maximum(TIME - s, 0)
    return np.exp(-(before / rise) ** 2 - after / fall)


def wobble(rate):
    """A smooth random curve with rate knots a second."""
    knots = rng.standard_normal(int(N * rate / SR) + 4)
    return map_coordinates(knots, [TIME * rate], order=2)


def noise():
    """White noise."""
    return rng.standard_normal(N)


def rattle(grain_db, rate):
    """Noise broken into many tiny contacts."""
    return unit(noise() * amp(grain_db * wobble(rate)))


def pulses(turns, scatter_db):
    """One impulse per whole turn, of scattered size, at unit mean power."""
    at = np.flatnonzero(np.diff(np.floor(turns)) > 0)
    train = np.zeros(N)
    # wider spacing gets a larger impulse, which evens out the power
    train[at] = np.sqrt(np.gradient(at)) * amp(scatter_db * rng.standard_normal(len(at)))
    return unit(train)


def puffs(turns, force, start, rise, fall, base):
    """Gate that swells and dies once a cycle over a steady base; times are shares of the cycle."""
    age = (turns - start) % 1
    burst = unit((1 - np.exp(-(age / rise) ** 2)) * np.exp(-age / fall))
    return np.sqrt(((force * burst) ** 2 + base ** 2) / (force ** 2 + base ** 2))


def body(x, colour, modes=()):
    """Causal filter of unit power: a broad colour lifted at each resonance."""
    lift = sum(db / (1 + (2 * (HZ - hz) / width) ** 2) for hz, width, db in modes)
    gain = unit(amp(along(colour, HZ) + lift))
    # folding the cepstrum gives minimum phase
    cepstrum = irfft(np.log(gain + 1e-6), SIZE)
    cepstrum[1:SIZE // 2] *= 2
    cepstrum[SIZE // 2:] = 0
    return irfft(rfft(x, SIZE) * np.exp(rfft(cepstrum)), SIZE)[:N]


def shifting(x, depth_db):
    """Lift and dip narrow bands at random from moment to moment, so that no two blows ring alike."""
    z = signal.stft(x, nperseg=512)[2]
    field = uniform_filter1d(rng.standard_normal(z.shape), size=3, axis=0)
    field = uniform_filter1d(field, size=9, axis=1)
    gain = amp(depth_db * np.clip(unit(field), -2, 2))
    return signal.istft(z * unit(gain), nperseg=512)[1][:N]


def scene():
    """The cart in the yard."""
    cart = truck_echo(engine()) + gears() + clangs() + starter() + knocks() + latch() + tyres()
    return (cart + amp(-15) * yard(cart) + garden())[None]


def record(dry):
    """Cut everything above the band limit."""
    return irfft(rfft(dry, SIZE) * (HZ < TOP_HZ), SIZE)[:, :N]


dry = scene()
out = record(dry)
to_wav(out)
```